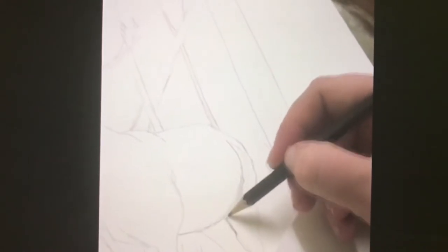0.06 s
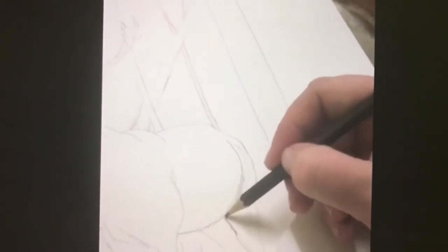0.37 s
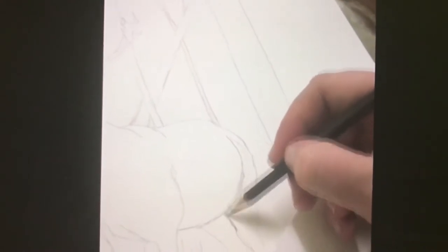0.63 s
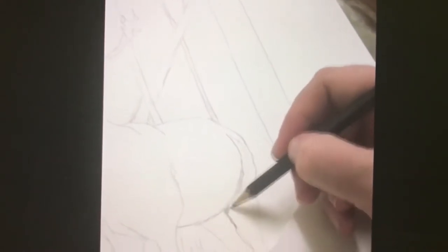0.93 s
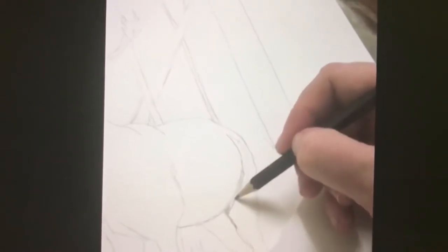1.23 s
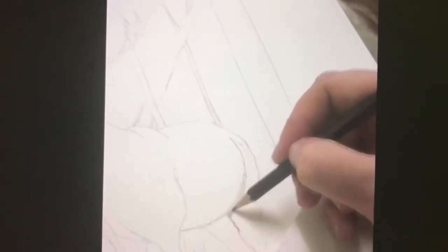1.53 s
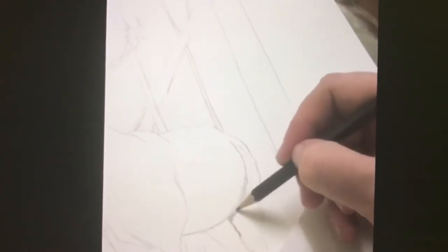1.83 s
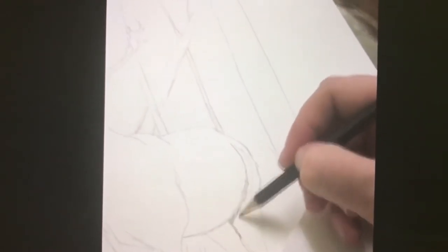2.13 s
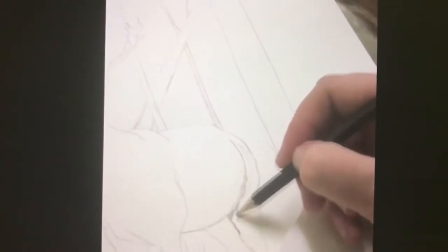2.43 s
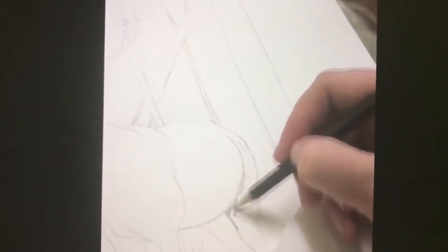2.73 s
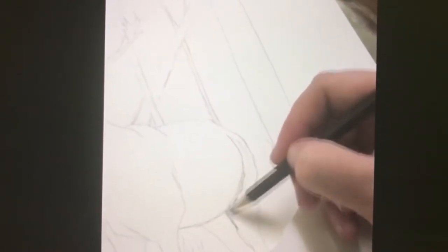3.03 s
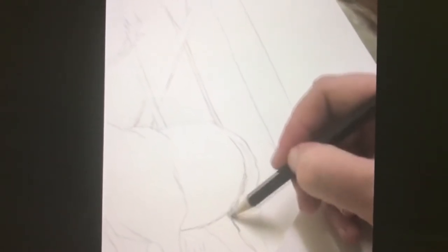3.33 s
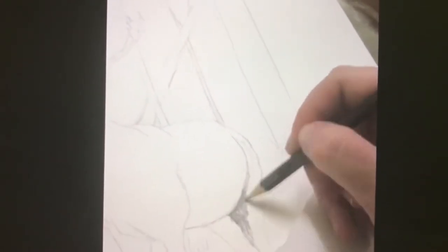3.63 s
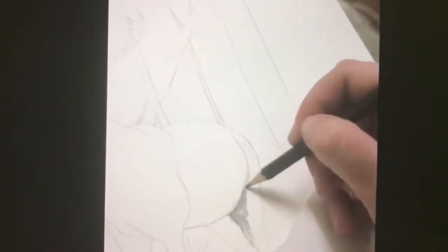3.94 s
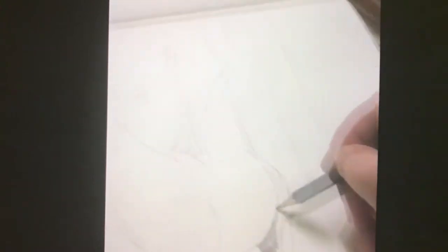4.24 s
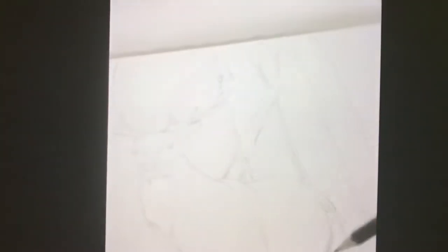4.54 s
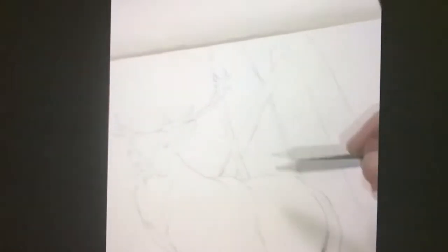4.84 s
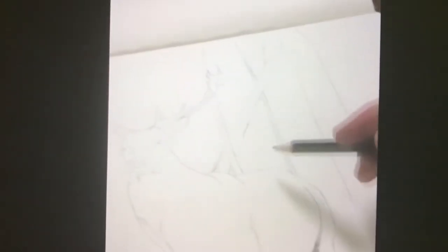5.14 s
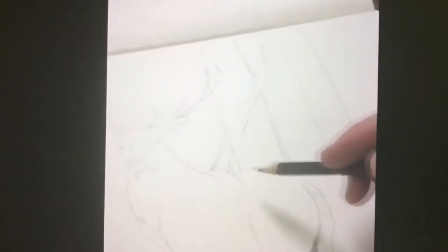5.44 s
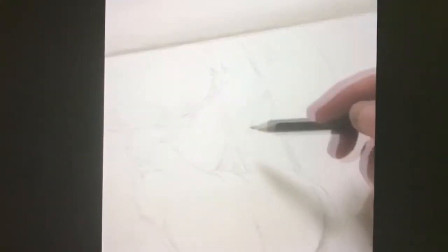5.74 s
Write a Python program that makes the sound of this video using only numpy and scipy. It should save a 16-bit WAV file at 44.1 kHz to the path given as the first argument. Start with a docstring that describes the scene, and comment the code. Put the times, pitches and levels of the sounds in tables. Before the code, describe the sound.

Faint, close pencil shading on a sketch pad gives way to loud rasping swipes of a hand over the paper in a quiet room.

```python
"""Short, faint pencil strokes shade a sketch pad, close up: the lead rasps over the paper's fibres,
squeaks now and then and once catches in a quick judder. Then the side of the hand brushes across
the sheet in loud sweeps, skin dragging over many fibres at once. The ring of pad and desk colours
all the rubbing. Soft hiss and mains hum fill the small, quiet room; the level dips briefly once."""
import sys
import numpy as np
from scipy import signal
from scipy.fft import rfft, irfft
from scipy.io import wavfile

SR = 44100
rng = np.random.default_rng(int(sys.argv[2]) if len(sys.argv) > 2 else 0)


def dump_mix(stems):
    """Bounce the given channels to the path in sys.argv[1] as a 16-bit WAV at rate SR."""
    frames = np.atleast_2d(stems).T  # one column per channel
    limited = np.clip(frames, -1, 1)  # hard clip at full scale
    pcm = np.round(limited * 32767).astype(np.int16)
    wavfile.write(sys.argv[1], SR, pcm)


N = 263718
T = np.arange(N) / SR
HZ = np.fft.rfftfreq(N, 1 / SR)


def amp(db):
    """Decibels to gain."""
    return 10 ** (np.asarray(db) / 20)


def unit(x):
    """Scales to rms 1."""
    return x / np.sqrt(np.mean(x ** 2) + 1e-20)


def bell(x, middle, width):
    """A smooth hump of height 1."""
    return np.exp(-np.minimum((2 * (x - middle) / width) ** 2, 60))


def wander(rate):
    """A random drift of rms 1, with swings up to about the given rate in Hz."""
    knots = rng.standard_normal(4000)
    return unit(np.interp(T * 2 * rate, np.arange(len(knots)), knots))


def slope(points):
    """An EQ curve in dB, straight between its points on a log frequency axis."""
    hz, db = np.transpose(points)
    return np.interp(np.log(HZ + 1), np.log(hz), db)


def humps(peaks):
    """An EQ curve in dB with one hump for each peak."""
    hz = HZ[::16]
    return np.interp(HZ, hz, sum(db * bell(hz, middle, width) for middle, width, db in peaks))


def colour(x, db):
    """Filters by a gain in dB for every frequency."""
    return irfft(rfft(x, N) * amp(db), N)


def above(x, hz):
    """The part of a sound above a frequency."""
    return colour(x, -10 * np.log10(1 + (hz / (HZ + 1)) ** 20))


def resonance(hz, width_hz):
    """A resonance that friction keeps kicking, at rms 1."""
    return unit(irfft(rfft(rng.standard_normal(N)) * bell(HZ, hz, 2 * width_hz), N))


def ring(middle_s, length_s, hz, width_hz):
    """A brief swell of a resonance that friction keeps kicking."""
    first, count = max(round((middle_s - 1.5 * length_s) * SR), 0), 2 ** 16
    kicks = rfft(rng.standard_normal(count))
    tone = irfft(kicks * bell(np.fft.rfftfreq(count, 1 / SR), hz, 2 * width_hz))
    swell = bell(T[first:first + count], middle_s, length_s)
    out = np.zeros(N)
    out[first:first + count] = unit(tone[:len(swell)] * swell) * np.sqrt(np.mean(swell ** 2))
    return out


def pad_db():
    """The broad ring of pad and desk, as an EQ curve."""
    # body resonances: pitch_hz, width_hz, lift_db
    pad_modes = [(590, 425, 12), (1950, 1300, 9), (3498, 1415, 14), (5350, 1020, 11), (6727, 1090, 10.5),
                 (9585, 1300, 11), (11630, 1400, 7)]
    return humps(pad_modes)


def background(hiss_db=-59.5):
    """Room tone: soft hiss, coloured by the desk, and mains hum."""
    # hiss before the desk colours it: frequency_hz, level_db
    air_curve = [(20, -29), (50, 13), (85, 4), (160, -1), (350, 0.5), (520, -9.5), (700, -12), (1050, -6.5),
                 (1350, -3.5), (1600, 0), (2100, -4.5), (2750, -6.5), (3600, -9.5), (4200, -7),
                 (4700, -11.5), (6000, -14), (7700, -20), (9600, -32), (12500, -22.5), (15500, -24.5)]
    # mains partials: pitch_hz, level_db
    partials = [(100, -68), (200, -79.5), (600, -78)]
    hiss = unit(colour(rng.standard_normal(N), slope(air_curve) + pad_db())) * amp(.5 * wander(rate=13))
    hum = sum(amp(db) * unit(np.sin(2 * np.pi * (hz * T + rng.random()))) for hz, db in partials)
    return amp(hiss_db) * hiss + hum


def room(x, near_db=-11, near_t60=.045, far_db=-23, far_t60=0.34):
    """Quick reflections off the desk, then the faint tail of a small room."""
    t = np.arange(SR // 2) / SR
    near, far = rng.standard_normal((2, len(t))) * (t > .002)
    near, far = near * amp(-60 * t / near_t60), far * amp(-60 * t / far_t60)
    echo = (t == 0) + amp(near_db) * near / np.linalg.norm(near) + amp(far_db) * far / np.linalg.norm(far)
    return signal.oaconvolve(x, echo / np.linalg.norm(echo))[:N]


def outlining(end_s=2.15):
    """1 while the pencil draws the outline, fading to 0 as it starts to fill in."""
    return np.clip((end_s - T) * 10, 0, 1)


def nudges(drone_db=-76.5, swing_db=3):
    """Dull sounds of the pad under the hand: shifts of weight, and a low mode droning in the outline."""
    # the hand shifts and slides: middle_s, length_s, pitch_hz, width_hz, level_db
    shifts = [(1.291, 0.1, 400, 164, -64.5), (2.86, 0.12, 115, 50, -64), (3.165, 0.32, 118, 48.5, -71.5),
              (3.327, 0.12, 385, 103, -62.5), (4.163, .09, 360, 129, -66), (4.42, 0.84, 400, 202, -69.5),
              (5.603, 0.023, 495, 49.4, -44), (5.902, 0.26, 1720, 523, -57.5)]
    drone = outlining() * amp(drone_db + swing_db * wander(rate=3.81)) * resonance(hz=469, width_hz=25)
    return drone + sum(amp(db) * ring(s, length, hz, width) for s, length, hz, width, db in shifts)


def ticks(rise_s=.003):
    """A touch-down snaps a clump of fibres within a few milliseconds."""
    # tip or hand landing on the sheet: start_s, level_db
    landings = [(0.721, -50.5), (0.831, -55), (1.031, -55), (3.022, -53), (3.101, -50), (4.62, -44.5),
                (5.863, -47)]
    snap_db = slope([(300, -5.0), (1500, -9), (3300, -0.5), (6000, -7.0), (9000, -20), (15000, -15)])
    snap = unit(colour(rng.standard_normal(N), snap_db + pad_db()))
    touches = np.zeros(N)
    for s, db in landings:
        touches[round(s * SR)] = amp(db)
    age = np.arange(SR // 20) / SR / rise_s
    return snap * signal.oaconvolve(touches, age * np.exp(1 - age))[:N]


def squeaks_and_rings(whistle_db=-77.5, swing_db=5):
    """The lead squeaks high and faintly whistles; the sheet rings lower under firm strokes."""
    # high lead squeaks and lower sheet rings: middle_s, length_s, pitch_hz, width_hz, level_db
    tones = [(0.083, 0.051, 4270, 70, -51), (0.093, 0.042, 3740, 70, -55), (0.337, .04, 4170, 120, -64),
             (0.609, .09, 4200, 110, -67), (0.751, 0.058, 4210, 80, -57.5), (.91, 0.042, 3860, 90, -57),
             (1.444, 0.097, 3750, 90, -62), (1.582, 0.028, 1710, 220, -56), (1.982, 0.048, 3670, 90, -59.5),
             (2.13, 0.044, 4020, 60, -59), (2.17, 0.027, 1890, 257, -47.5), (3.028, .025, 1760, 220, -56.5),
             (3.249, 0.028, 1740, 220, -55)]
    whistle = outlining() * amp(whistle_db + swing_db * wander(rate=6.4))
    whistle *= resonance(hz=4117, width_hz=120)
    return whistle + sum(amp(db) * ring(s, length, hz, width) for s, length, hz, width, db in tones)


def slips(start_s=2.7088, count=10, gap_s=.0049, slowing=1.083, first_db=-34.5, fade_db_per_s=48):
    """Times and levels of the lead's slips: an uneven run that slows and weakens."""
    gaps = gap_s * slowing ** np.arange(count - 1) * np.exp(.18 * rng.standard_normal(count - 1))
    age = np.append(0, np.cumsum(gaps))
    return zip(start_s + age, first_db - fade_db_per_s * age + rng.standard_normal(count))


def judder(modes_hz=(1320, 1700, 2350), balance_db=(-2.5, 0, -8), knock_s=0.0038):
    """The lead catches and slips; each slip knocks the sheet for a few cycles, never quite alike."""
    t = np.arange(-300, 300) / SR
    out = np.zeros(N)
    for s, db in slips():
        gains = amp(balance_db + 2 * rng.standard_normal(3))
        tone = sum(gain * np.cos(2 * np.pi * hz * t) for hz, gain in zip(modes_hz, gains))
        first = round((s + t[0]) * SR)
        out[first:first + len(t)] += amp(db) * bell(t, 0, knock_s) * tone / 2
    return out


def fibres(per_s, spread_db):
    """Paper fibres snap free one by one: many small clicks, a few large."""
    size = amp(spread_db * np.minimum(rng.exponential(1, N), 4))
    return unit(size * rng.choice([-1, 1], N) * (rng.random(N) < per_s / SR))


def hand_reflection(x, delay_s=.0021, sway=0.088, echo_db=-7):
    """The moving hand reflects the sound, so fine ripples in its colour keep shifting."""
    late = delay_s * (1 + sway * wander(rate=6.4))
    return x + amp(echo_db) * np.interp(T - late, T, x)


def shading(strokes_per_s=13, drift=.2, swing_db=3):
    """The light force of the lead as it goes to and fro at an uneven pace."""
    # pressure between the firm strokes: time_s, level_db
    glide = [(0, -63.5), (.5, -72), (.9, -59.5), (1.15, -67), (1.9, -65.5), (2.3, -60), (2.9, -57.5),
             (3.5, -62), (3.9, -63.5), (4.3, -69.5), (4.68, -61)]
    glide_db = np.interp(T, *np.transpose(glide), right=-100)
    turns = np.cumsum(strokes_per_s * (1 + drift * wander(rate=8.1))) / SR
    return amp(glide_db + swing_db * np.sin(2 * np.pi * turns) + 2.6 * wander(rate=23))


def strokes(lean=0.52):
    """Force and brightness of the firm strokes: the lead bites quickly and lets go more slowly."""
    # firm pencil strokes: peak_s, length_s, level_db, brightness_db
    marks = [(0.14, 0.035, -50.5, 0), (0.292, 0.016, -55.5, 2), (0.399, 0.02, -57.5, 1.5),
             (0.696, 0.026, -50, -1), (0.726, 0.039, -50, 2), (0.792, 0.034, -54, -0.5),
             (0.831, 0.02, -47.5, 2.5), (0.872, 0.039, -52, 0), (1.036, 0.023, -46.5, -0.5),
             (1.129, 0.019, -55, 3), (1.222, 0.025, -53, 2.5), (1.318, 0.026, -52.5, -2),
             (1.471, 0.033, -53.5, 0.5), (1.571, 0.042, -55.5, 0.5), (1.709, 0.026, -52.5, 3.5),
             (2.158, 0.038, -44.5, 1), (2.305, 0.034, -48, 1), (2.432, 0.034, -47.5, 1),
             (2.55, 0.035, -54, 0), (2.703, 0.015, -50, -3.5), (2.892, 0.0059, -57, 4),
             (2.95, 0.018, -51.5, 0.5), (3.027, 0.027, -49.5, 0), (3.101, 0.011, -43, 0),
             (3.137, 0.035, -55, 1.5), (3.207, 0.011, -52, 3.5), (3.241, 0.034, -55, 1),
             (3.288, 0.02, -51, 0), (3.38, 0.018, -49.5, -1), (3.484, 0.02, -54.5, 0),
             (3.869, 0.021, -56, 0.5), (3.975, 0.023, -54.5, 1), (4.336, 0.022, -59, 1.5)]
    t = T[::20]
    power = sum((amp(db) * bell(t, s, length * (1 + lean * np.sign(t - s)))) ** 2
                for s, length, db, _ in marks)
    bright_db = sum(db * bell(t, s, 2 * length) for s, length, _, db in marks)
    return np.interp(T, t, np.sqrt(power)), np.interp(T, t, bright_db)


def pencil(split_hz=4700):
    """The lead rasps over the paper's tooth; a firm stroke has more edge than a light glide."""
    # the lead's rub before the pad colours it: frequency_hz, level_db
    lead_curve = [(200, -21), (900, -43), (1600, 2), (2800, -9.5), (3600, -5), (4700, -4), (5900, 2),
                  (6800, -8), (7700, -22), (9600, -14.5), (12000, -18.5), (15500, -20)]
    firm, bright_db = strokes()
    force = np.hypot(firm, shading())
    rub = fibres(per_s=4000, spread_db=1.5) * amp(0.95 * wander(rate=210))
    rasp = unit(hand_reflection(colour(rub, slope(lead_curve) + pad_db())))
    edge = above(rasp, split_hz)
    bite = amp(bright_db + 1.24 * wander(rate=28)) * (force / amp(-46.5) + 1e-3) ** 0.076
    return force * (edge * bite + (rasp - edge) / bite)


def sweeps(attack_s=0.016, release_db_per_s=780, fizz_fade_db=4.5, graze_db=-60, graze_fizz_db=-12):
    """Force and fizz of the hand: each sweep lands fast, dulls and lifts off to a bare graze."""
    # hand sweeps: start_s, length_s, level_db, rise_db, mid_swell_db, relative_fizz_db
    passes = [(4.686, 0.033, -53, 15, -4, -15), (4.734, 0.11, -46.5, 0.5, -2, -17),
              (4.813, 0.14, -41.5, 6.5, 3.2, -8.5), (4.958, 0.12, -42, 6, 1.5, -11.5),
              (5.147, 0.2583, -32.5, -5.5, -1.6, -15), (5.487, 0.29, -36, -2, 5, -14.5),
              (5.856, 0.014, -35.5, 0.5, 4, -13)]
    force = amp(graze_db) * (T > passes[0][0])
    fizz = force * amp(graze_fizz_db)
    for start, length, db, rise_db, swell_db, fizz_db in passes:
        age = T - start
        progress = np.clip(age / length, 0, 1)
        hold_db = db + rise_db * (progress - .5) + swell_db * np.sin(np.pi * progress)
        release_db = release_db_per_s * np.maximum(age - length, 0)
        press = np.clip(age / attack_s, 0, 1) * amp(hold_db - release_db)
        force = np.hypot(force, press)
        fizz = np.hypot(fizz, press * amp(fizz_db - fizz_fade_db * (progress - .5)))
    return force, fizz


def hand(low_hz=2650, fizz_hz=7900, low_db=-7.5, middle_db=-1.5, boom_db=-64):
    """Skin drags over many fibres at once: a dense rasp topped with fizz, over the pad's boom."""
    # the skin's rub before the pad colours it: frequency_hz, level_db
    skin_curve = [(100, -19), (400, -27.5), (850, -20), (1450, -6), (2700, 1), (3700, 4.5), (4600, 2),
                  (5800, 4), (6700, 0), (7700, -4), (9600, -11.5), (12500, -7.5), (14500, -10.5),
                  (15600, -24)]
    # narrow, steady peaks that nearby reflections add to the rub: pitch_hz, width_hz, unscaled_lift_db
    reflection_peaks = [(2035, 70, 4), (2310, 110, 4), (3114, 45, 5), (3427, 55, 3), (3577, 45, 3),
                        (3760, 110, 4), (4060, 45, 3), (5033, 45, 4), (5217, 70, 5), (5420, 90, 5),
                        (5977, 45, 5), (6340, 40, 5), (6895, 40, 5), (7041, 35, 5)]
    rub = fibres(per_s=13000, spread_db=3.5) * amp(wander(rate=150))
    rasp = hand_reflection(colour(rub, slope(skin_curve) + pad_db() + 0.78 * humps(reflection_peaks)))
    upper, fizz = above(rasp, low_hz), above(rasp, fizz_hz)
    force, fizz_force = sweeps()
    low = unit(rasp - upper) * amp(low_db + 0.7 * wander(rate=41))
    middle = unit(upper - fizz) * amp(middle_db + 0.62 * wander(rate=25))
    boom = amp(boom_db) * (force / force.max()) ** .3 * resonance(hz=550, width_hz=260)
    return force * (low + middle) + fizz_force * unit(fizz) + boom


def scene():
    """Pencil and hand in the room, over the pad's dull nudges and the room tone, in mono."""
    rubbing = pencil() + ticks() + squeaks_and_rings() + judder() + hand()
    return (room(rubbing) + nudges() + background())[None]


def record(dry, bass_hz=250, top_hz=15650):
    """The level above the bass dips briefly once, and the highest treble is cut off."""
    # the dip: middle_s, length_s, depth_db
    dip = (3.716, .032, -11)
    middle_s, length_s, depth_db = dip
    bass = signal.sosfiltfilt(signal.butter(2, bass_hz, fs=SR, output="sos"), dry)
    dipped = bass + (dry - bass) * amp(depth_db * bell(T, middle_s, length_s))
    high_cut = signal.firwin(511, top_hz, window=("kaiser", 9), fs=SR)
    return signal.oaconvolve(dipped, high_cut[None], "same")


dry = scene()
out = record(dry)
dump_mix(out)
```